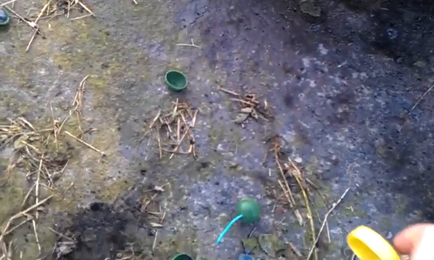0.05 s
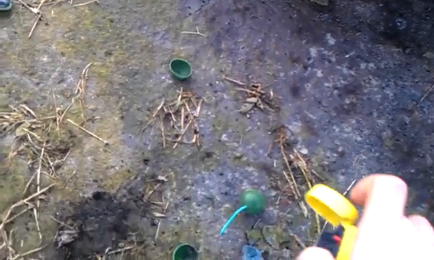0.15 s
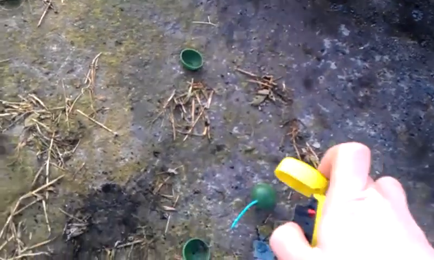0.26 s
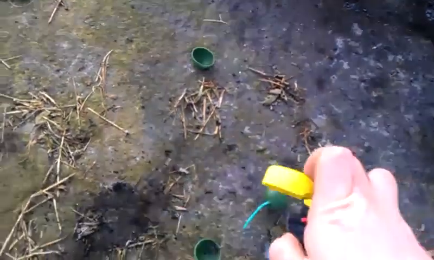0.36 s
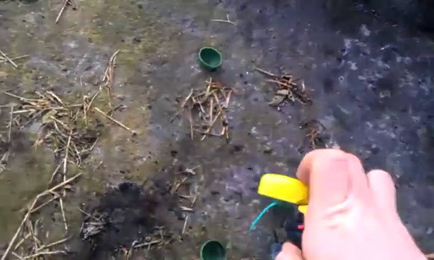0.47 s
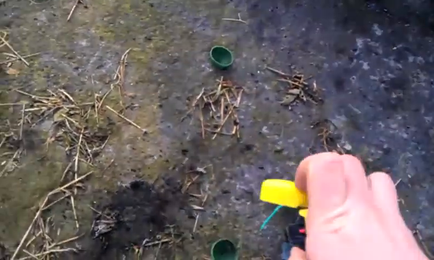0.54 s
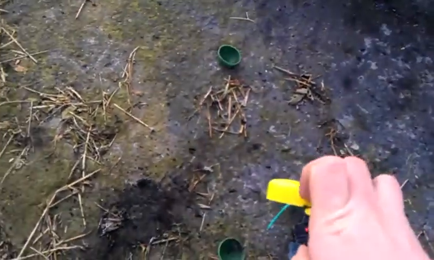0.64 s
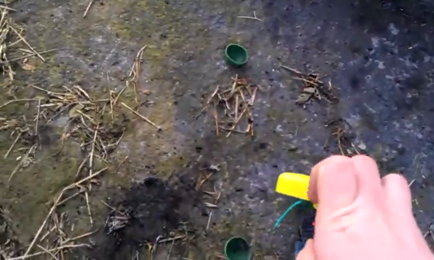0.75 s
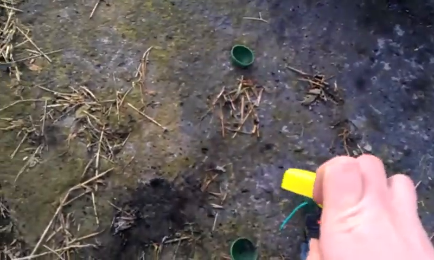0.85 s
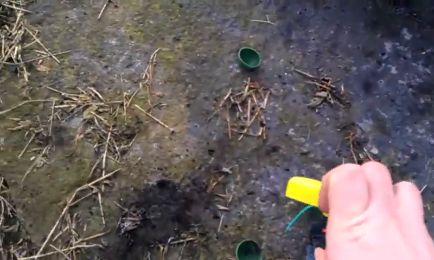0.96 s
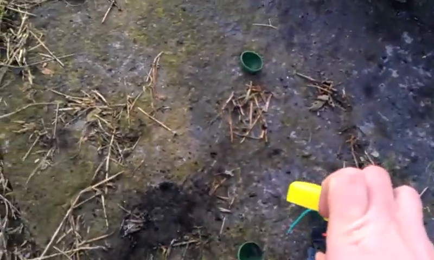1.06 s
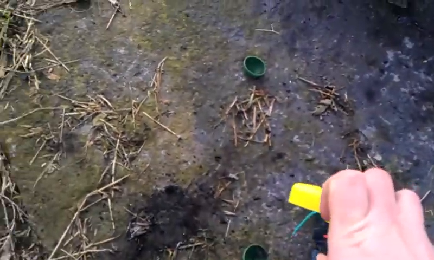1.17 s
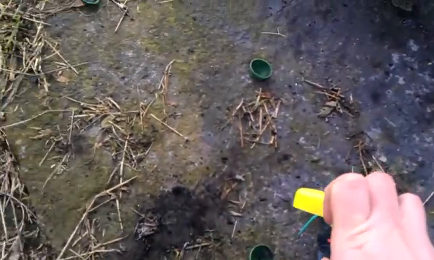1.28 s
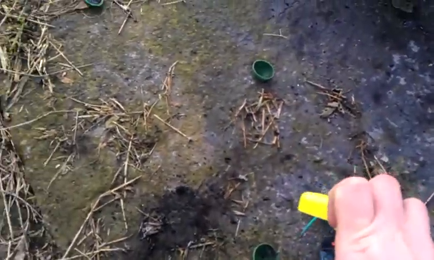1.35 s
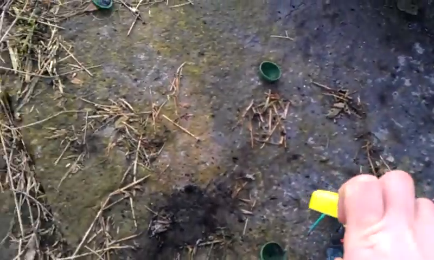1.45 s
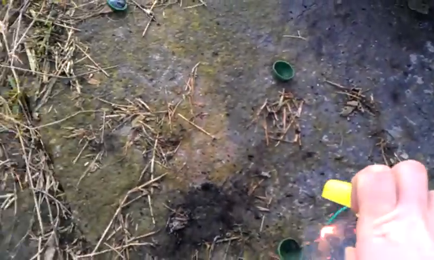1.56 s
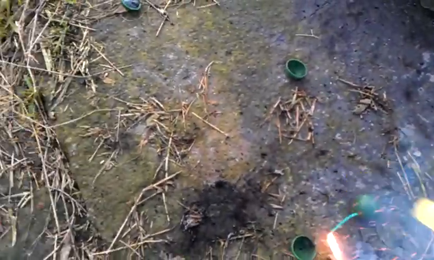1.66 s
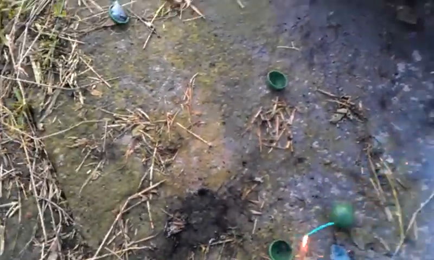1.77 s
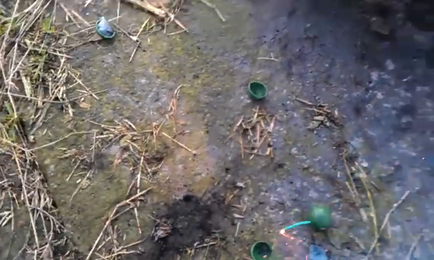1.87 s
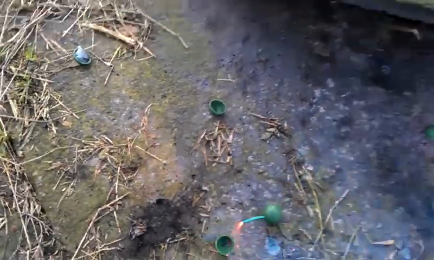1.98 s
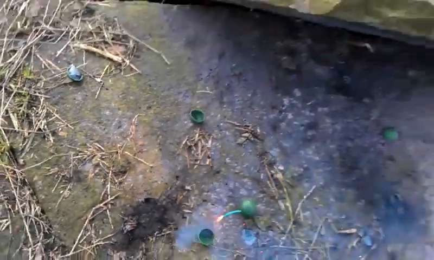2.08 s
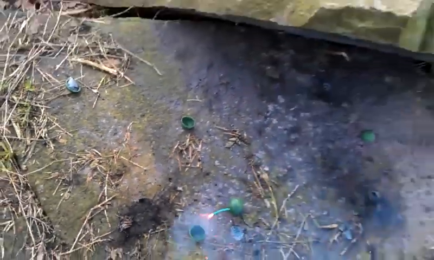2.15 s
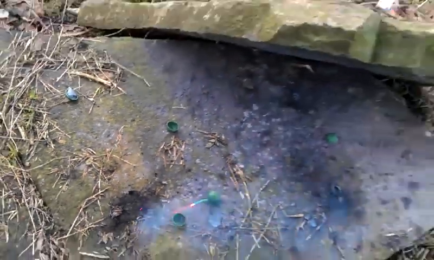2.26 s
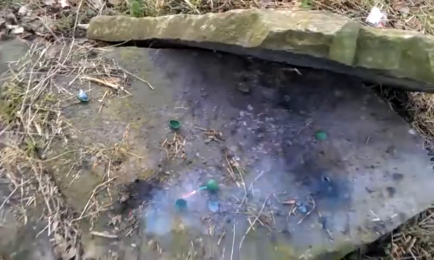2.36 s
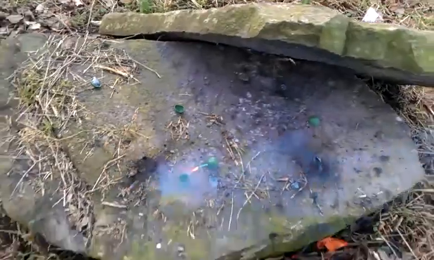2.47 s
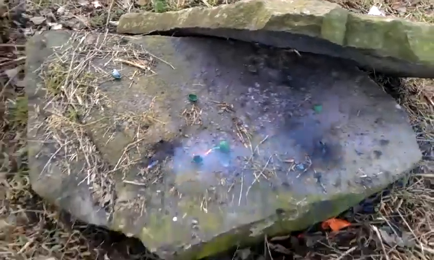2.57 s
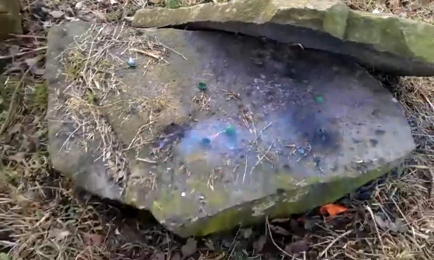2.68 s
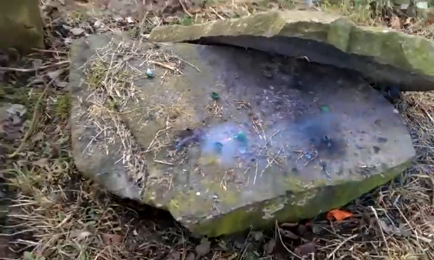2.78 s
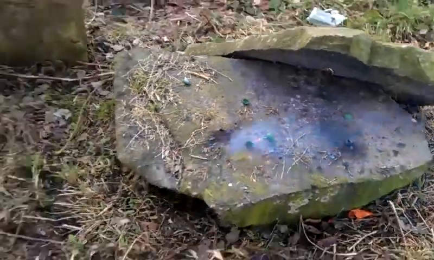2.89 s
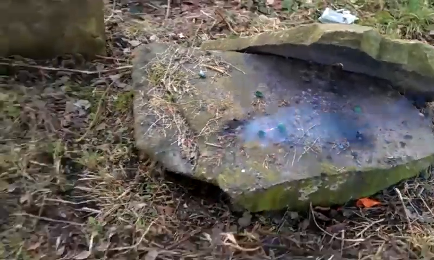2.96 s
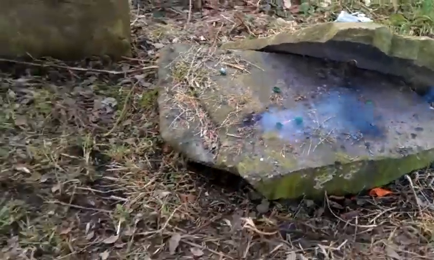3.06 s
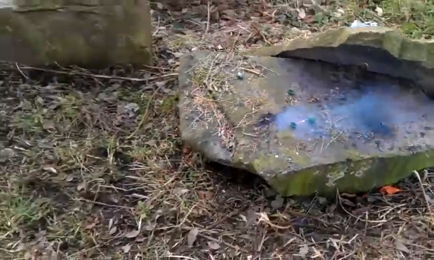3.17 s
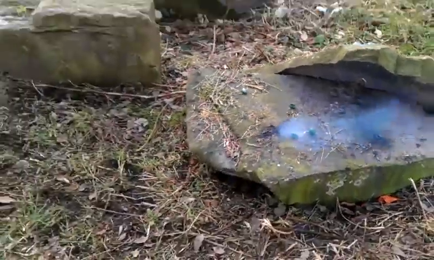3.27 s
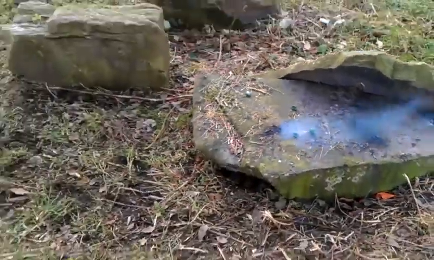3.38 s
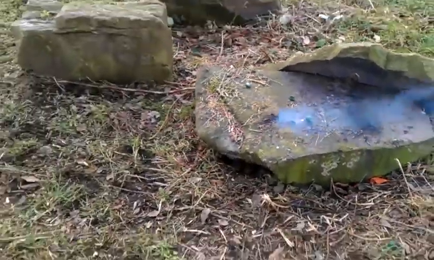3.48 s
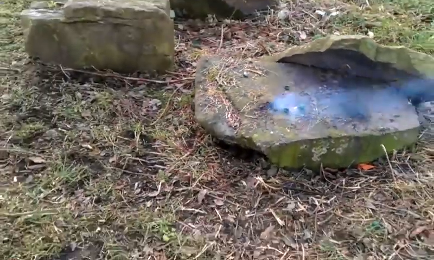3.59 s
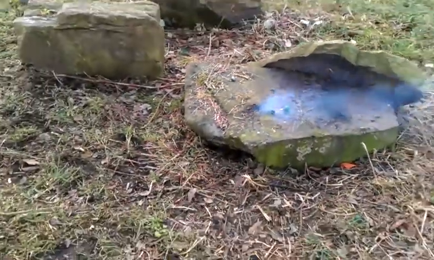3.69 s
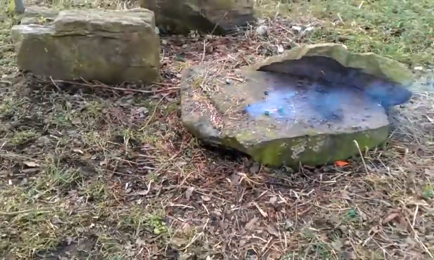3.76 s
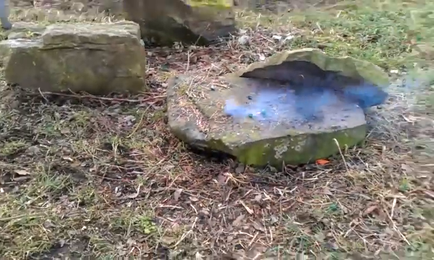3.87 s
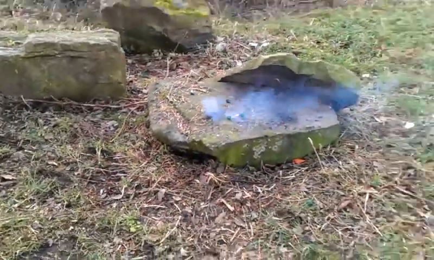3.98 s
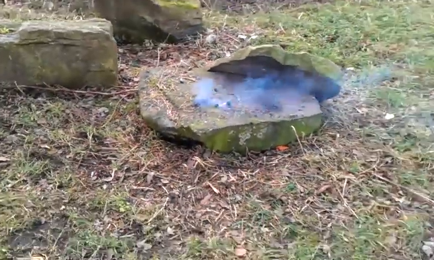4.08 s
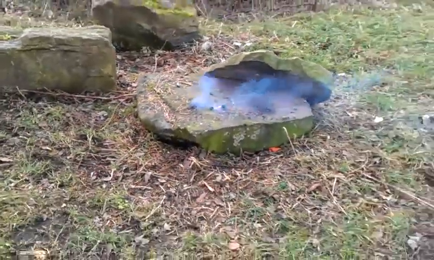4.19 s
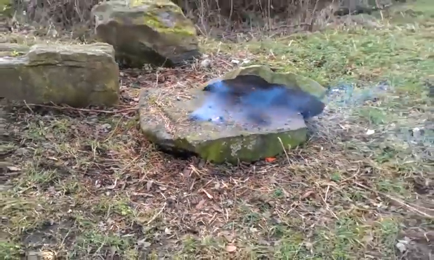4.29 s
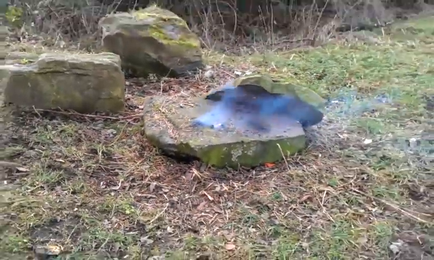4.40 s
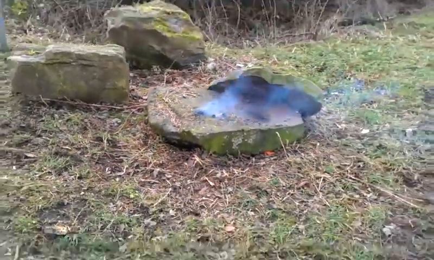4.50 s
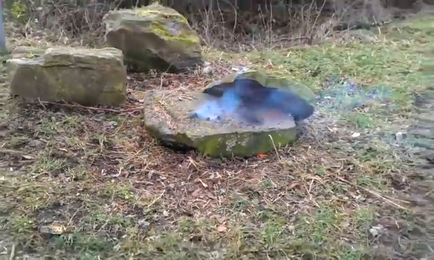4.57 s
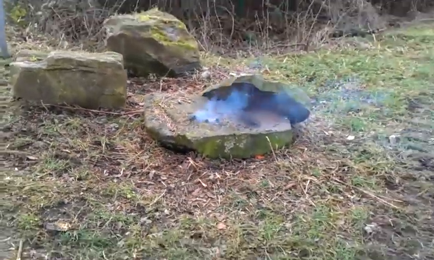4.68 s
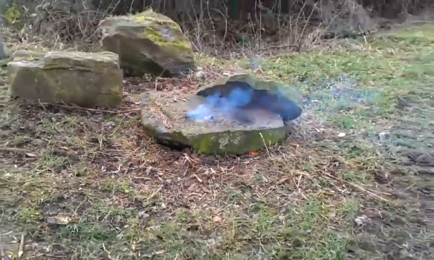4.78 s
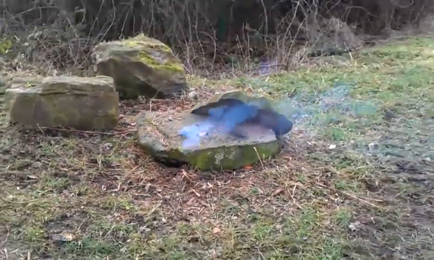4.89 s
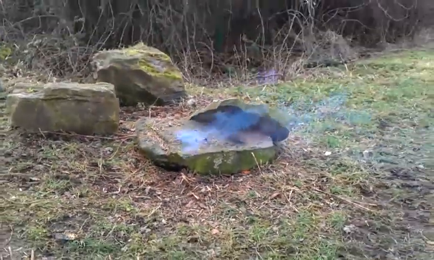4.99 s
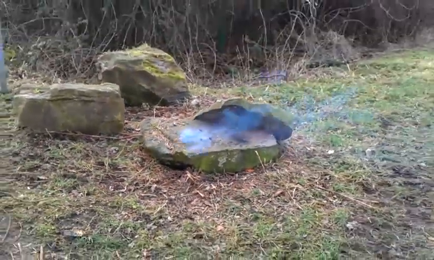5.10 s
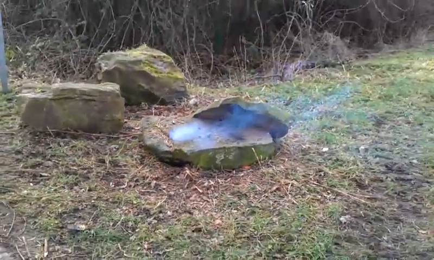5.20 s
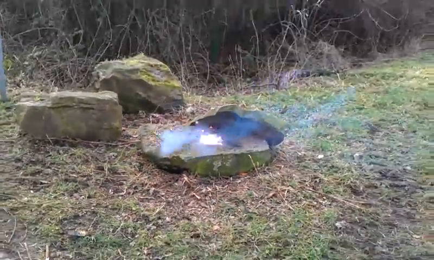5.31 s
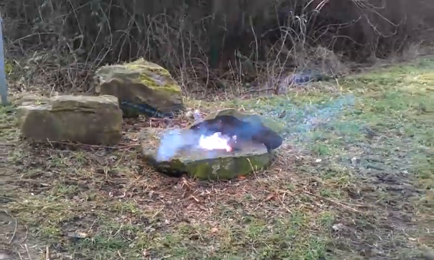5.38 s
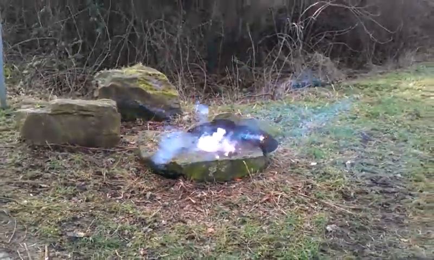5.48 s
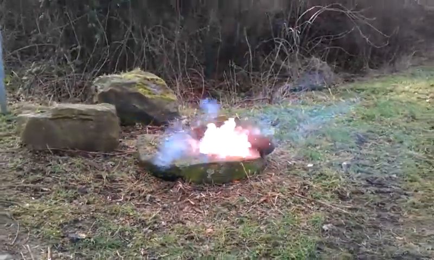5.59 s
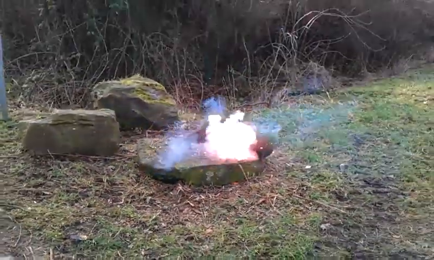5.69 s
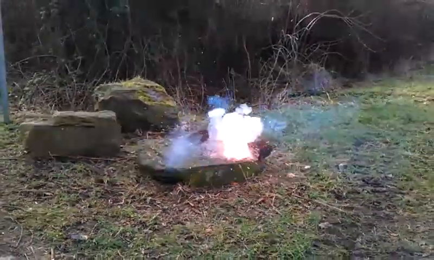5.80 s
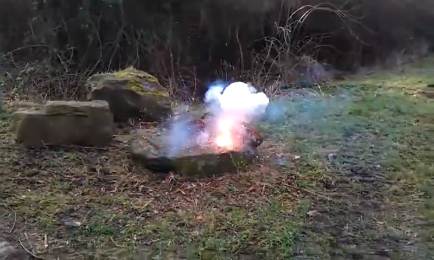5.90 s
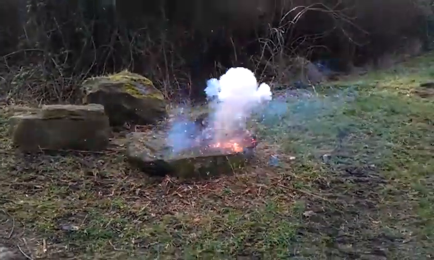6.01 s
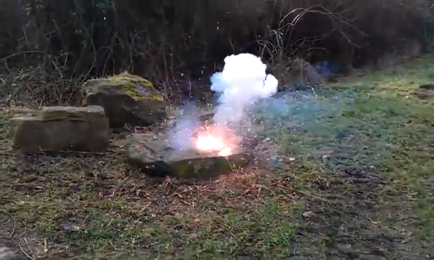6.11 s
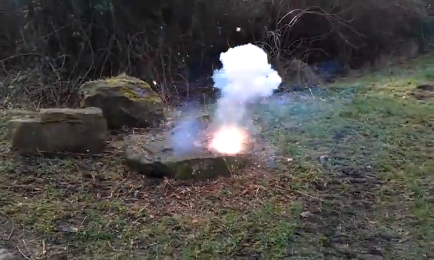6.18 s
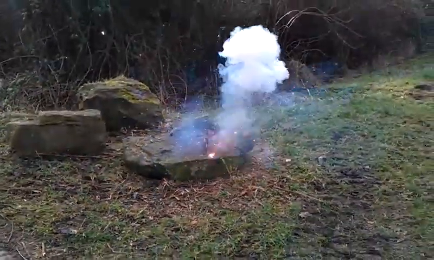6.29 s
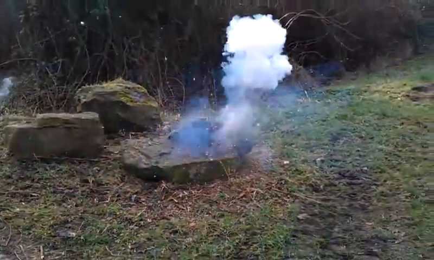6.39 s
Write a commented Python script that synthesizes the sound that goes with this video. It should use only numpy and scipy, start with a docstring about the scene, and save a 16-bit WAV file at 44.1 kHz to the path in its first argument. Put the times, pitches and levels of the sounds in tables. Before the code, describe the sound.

Outdoors, a sleeve rustles faintly, then a gas lighter clicks and burns with a soft jet flame. A small firework's fuse flares up, hissing and sputtering, and grows fainter as the person holding the microphone backs away with faint, low steps. The fuse spurts, the shell snaps and single cracks ring out. Loud, dense crackling follows, overloading the mono microphone.

```python
"""A sleeve rustles in the open air, then a gas lighter clicks and burns with a small jet flame.
The fuse of a little firework on a stone slab flares up, hissing and sputtering as its powder burns,
and grows fainter while the person holding the microphone backs away over the grass.
The fuse spurts, the shell splits and single cracks ring out. A storm of exploding granules follows,
hard enough to overload the mono microphone and drive its limiter."""
import sys
import numpy as np
from scipy import signal
from scipy.fft import rfft, irfft, next_fast_len
from scipy.io import wavfile
from scipy.ndimage import map_coordinates

SR = 44100
rng = np.random.default_rng(int(sys.argv[2]) if len(sys.argv) > 2 else 0)


def master_out(mix):
    """Clip the mix to full scale and print it as 16-bit PCM to the path in sys.argv[1]."""
    frames = np.transpose(np.atleast_2d(mix))
    ceiling = np.clip(frames, -1, 1)
    pcm = np.round(ceiling * 32767).astype(np.int16)
    wavfile.write(sys.argv[1], SR, pcm)


N = 284445
TIME = np.arange(N) / SR

# soft bed of open air: frequency_hz, level_db
AIR_COLOUR = [(15, -34), (25, -15), (75, -6), (173, -2), (233, -4), (322, -8), (389, -9), (482, -9),
              (703, -8.5), (762, -7.5), (1570, -11), (1800, -16), (3000, -22.5), (15500, -29.5)]
# footfalls and jolts of the hand: peak_s, level_db
STEPS = [(1.36, -56), (2.28, -54), (3.0, -51), (3.33, -53), (3.98, -64), (4.3, -59), (4.61, -51),
         (4.77, -47), (5.18, -49), (5.36, -49), (5.52, -56)]
# their low rumble: frequency_hz, level_db
RUMBLE_COLOUR = [(20, -7), (50, -2), (90, -3.5), (150, -9.5), (260, -46), (600, -60)]
# knocks of grip, twigs and splitting shell: start_s, level_db, centre_hz, edge_to_centre_ratio, t60_s
KNOCKS = [(0.359, -36, 2000, 1.17, 0.024), (2.529, -36, 400, 1.3, 0.027), (2.54, -40, 600, 2.5, 0.032),
          (2.664, -32.5, 113, 1.65, 0.15), (2.730, -35, 79.5, 1.65, 0.075), (2.837, -35, 650, 1.4, 0.022),
          (3.83, -38, 520, 1.7, 0.06), (4.344, -37, 377, 1.75, 0.039), (5.3362, -5, 1750, 3, 0.023)]
# thin hiss of escaping gas: frequency_hz, level_db
GAS_COLOUR = [(4000, -41), (6000, -9), (7500, 6), (9500, -4), (12000, -8), (16000, -15)]
# spits of gas: peak_s, level_db
GAS_SPITS = [(.82, -46.5), (1.255, -56)]
# hollow rush of the flame: frequency_hz, level_db
FLAME_COLOUR = [(200, -27), (320, -25), (800, -0.5), (1080, -8), (1510, -6), (1760, -11), (2050, -5),
                (2600, -13), (3700, -11.5), (4130, -24), (4600, -14), (5050, -14), (6300, -9.5),
                (8200, -18.5), (15500, -31)]
# snaps of the lighter's trigger: start_s, level_db
TRIGGER_SNAPS = [(.7572, 5.5), (.7690, -24)]
# ring of its plastic body: pitch_hz, level_db, t60_s
LIGHTER_MODES = [(1675, -13, .025), (2190, -3, .028), (2370, -6, .025), (2650, -15, .018),
                 (4005, -15, .025), (4430, -16, .022), (5414, -4, .022), (6215, -9, .016), (6798, -4, .02),
                 (7900, -4, .016), (8866, -7, .018), (9300, -6, .018), (10400, -8, .018),
                 (12600, -14, .014), (14030, -12, .016), (15100, -13, .014)]
# ticks as the trigger is let go: start_s, level_db
RELEASE_TICKS = [(2.6528, 4), (2.6565, 2.5), (2.66, -3.5)]
# their sharp, dry tone: frequency_hz, level_db
TICK_COLOUR = [(300, -53), (1100, -10), (1900, -0.5), (3000, -1.5), (6000, 5), (10000, 0), (16000, -14)]
# the holder's retreat from the fuse: time_s, distance_m
DISTANCE = [(2.0, .35), (2.75, 0.84), (3.5, 1.69), (4.7, 2.68), (5.7, 2.55)]
# the powder surges or falters, hardest just before the shell splits: peak_s, rise_s, fall_s, change_db
SURGES = [(1.8, 0.064, 0.095, 8), (2.38, 0.1, 0.032, 3.5), (2.72, 0.12, 0.038, 2.5), (3.2, 0.29, 0.24, 2.5),
          (3.63, .06, 0.096, -3), (3.8, .05, 0.081, 1), (4.02, 0.044, 0.089, 3), (4.35, 0.055, .1, 2),
          (4.86, 0.076, 0.25, 11), (5.17, 0.13, .08, 2.5), (5.316, 0.053, 0.036, 19), (5.4, .03, 0.057, 5),
          (5.545, 0.044, 0.025, 9), (5.63, 0.052, .2, 7.5)]
# bright jet of the fuse: frequency_hz, level_db
JET_COLOUR = [(1500, -48), (3000, -21), (4200, -9), (5500, -3.5), (7300, 1), (8500, -3.5), (10000, -11),
              (12000, -25.5), (16000, -53)]
# midrange roar under the jet: frequency_hz, level_db
ROAR_COLOUR = [(200, -24), (500, -15), (900, -5.5), (1400, -5), (2800, -1), (4000, -1), (7000, -17.5)]
# fine sizzle on top: frequency_hz, level_db
SIZZLE_COLOUR = [(7000, -23), (10000, 1), (12000, 0), (16000, -4.5)]
# flare of the priming and the low flutter after it: frequency_hz, level_db
FLARE_COLOUR = [(120, -27.5), (300, 1.5), (470, -8.5), (750, 0), (1050, -4.5), (1400, -9), (2500, -5),
                (5000, -36)]
# reflection off the holder's chest: time_s, lag_ms, gain
CHEST_ECHO = [(.9, 1.6, .22), (1.65, 1.64, .27), (2.05, 1.51, .46), (2.85, 1.655, .28), (4.3, 1.68, 0),
              (4.65, 1.65, .32), (4.88, 1.605, .39), (5.17, 1.715, .44), (5.6, 1.67, .06)]
# passing reflections off hand, arm and sleeve: start_s, end_s, first_lag_ms, last_lag_ms, gain
ARM_ECHOES = [(.6, 1.85, 1.32, 1.42, 0.27), (.6, 1.8, .8, .84, 0.13), (.6, 1.8, 1.04, 0.99, 0.1),
              (1.95, 2.75, .66, 0.78, .18), (2.75, 3.5, .715, .705, 0.25), (2.8, 3.55, 0.88, 1.09, 0.2),
              (3.25, 3.95, .68, .93, .28), (2.8, 3.5, 1.67, 1.14, 0.17), (2.8, 4.4, 1.83, 2.01, 0.12),
              (4.3, 5.4, .75, .67, 0.12)]
# single cracks, some with a thump on the microphone: start_s, crack_db, thump_db
CRACKS = [(5.4948, 4, -60), (5.5947, 4, -60), (5.61, -14, -60), (5.684, -9, -56), (5.69, 5, -60),
          (5.728, -1, -28), (5.7347, 3.5, -31), (5.7832, 10, -21), (5.8386, -5, -15), (5.886, -9, -16.5),
          (5.928, -10, -22.5), (5.9472, 5, -22.5), (6.008, -11, -20), (6.0367, 1, -20.5), (6.091, 9, -20),
          (6.135, 11, -32), (6.148, -11, -19.5), (6.1678, 3, -28), (6.1796, -2, -18.5), (6.269, -5, -60),
          (6.2848, 2, -31), (6.3065, -4.5, -15), (6.372, -2, -13.5)]
# crisp tone of the cracks, shared by trigger snap and sleeve: frequency_hz, level_db
CRISP_COLOUR = [(88, -34), (150, -11.5), (217, -9.5), (464, -7.5), (833, -13), (1090, -7.5), (2120, -8.5),
                (2430, -6.5), (2630, -7.5), (2840, -6.5), (3740, -6), (7250, 5.5), (10100, -6.5),
                (14900, -16), (15800, -11)]


def from_db(db):
    """Decibels to gain."""
    return 10 ** (np.asarray(db) / 20)


def in_time(rows):
    """Each column of a curve, joined by straight lines."""
    times, *columns = np.transpose(rows)
    return [np.interp(TIME, times, column) for column in columns]


def held(start_s, attack_s, end_s=np.inf, release_s=1):
    """Envelope: a straight attack, a hold and a dying release."""
    return np.clip((TIME - start_s) / attack_s, 0, 1) * np.exp(-np.maximum(TIME - end_s, 0) / release_s)


def swell(peak_s, rise_s, fall_s):
    """Envelope: a rounded hump of height 1."""
    return np.exp(-((TIME - peak_s) / np.where(TIME < peak_s, rise_s, fall_s)) ** 2)


def drift(rate_hz):
    """A wobble that glides between random values of spread 1."""
    knots = rng.standard_normal(N // 8)
    return np.interp(TIME * rate_hz, np.arange(len(knots)), knots)


def colour(x, spectrum):
    """Minimum-phase EQ that keeps the power of white noise."""
    size = 2 * next_fast_len(N // 2 + 8192)
    hz, db = np.transpose(spectrum)
    bins_hz = np.arange(size // 2 + 1) * SR / size
    shape = from_db(np.interp(np.log(bins_hz + 1), np.log(hz), db))
    shape /= np.sqrt(np.mean(shape ** 2))
    cepstrum = irfft(np.log(shape))
    cepstrum[1:size // 2] *= 2
    cepstrum[size // 2 + 1:] = 0
    return irfft(rfft(x, size) * np.exp(rfft(cepstrum)))[:N]


def noise(spectrum):
    """Steady coloured noise of rms 1."""
    return colour(rng.standard_normal(N), spectrum)


def impulses(events):
    """One click for each (start_s, level_db)."""
    clicks = np.zeros(N)
    for start_s, db in events:
        clicks[round(start_s * SR)] += from_db(db)
    return clicks


def bursts(clicks, t60_s):
    """Each click starts a burst of noise that dies away."""
    power = signal.lfilter([1], [1, -from_db(-120 / (t60_s * SR))], clicks ** 2 + 1e-18)
    return np.sqrt(power) * rng.standard_normal(N)


def ring(clicks, hz, t60_s):
    """Each click sets a dying sine ringing."""
    decay, angle = from_db(-60 / (t60_s * SR)), 2 * np.pi * hz / SR
    return signal.lfilter([0, np.sin(angle)], [1, -2 * decay * np.cos(angle), decay ** 2], clicks + 1e-18)


def butter(x, hz, kind, order=2):
    """Butterworth filter."""
    return signal.sosfilt(signal.butter(order, hz, kind, fs=SR, output="sos"), x)


def delayed(x, lag_ms):
    """The sound, late by a moving lag."""
    return map_coordinates(x, [np.arange(N) - lag_ms * SR / 1000], order=3)


def surroundings(air_db=-53.5, handling_db=-59.5, rustle_db=-58, brush_db=-54):
    """Open air wavers, a sleeve rustles and brushes once as the hand reaches out, and steps rumble."""
    air = from_db(air_db - drift(6.6)) * noise(AIR_COLOUR)
    rustle = from_db(rustle_db) * held(0, .004, end_s=.18, release_s=.28)
    brush = from_db(brush_db) * swell(.109, .01, .01)
    steps = sum(from_db(db) * swell(peak_s, .03, .058) for peak_s, db in STEPS)
    rumble = (from_db(handling_db) + steps) * noise(RUMBLE_COLOUR)
    return air + rumble + (rustle + brush) * noise(CRISP_COLOUR)


def knocks():
    """The grip on the lighter, twigs underfoot and the shell giving way: short, dull bands of noise."""
    sound = np.zeros(N)
    for start_s, db, hz, ratio, t60_s in KNOCKS:
        burst = bursts(impulses([(start_s, db)]), t60_s)
        makeup_gain = np.sqrt(SR / (np.pi * hz))
        sound += makeup_gain * butter(burst, [hz / ratio, hz * ratio], "band")
    return sound


def jet_flame(valve_s=.66, lit_s=.765, off_s=1.56, gas_db=-53, flame_db=-50, sag_db_per_s=6):
    """Gas escapes the lighter, then burns as a small jet flame that spits and slowly sinks."""
    attack_s, release_s = .0092, .036
    gas = from_db(gas_db) * held(valve_s, attack_s, lit_s, release_s)
    spits = sum(from_db(db) * swell(peak_s, .014, .014) for peak_s, db in GAS_SPITS)
    flame = from_db(flame_db - sag_db_per_s * (TIME - lit_s)) * held(lit_s, attack_s, off_s, release_s)
    return flame * noise(FLAME_COLOUR) + (gas + spits) * noise(GAS_COLOUR)


def lighter_clicks(body_db=-10, snap_db=-11, tick_db=-11):
    """The trigger snaps and rings the plastic body; later it springs back with three dry ticks."""
    press = impulses(TRIGGER_SNAPS)
    body = sum((-1) ** k * from_db(db) * ring(press, hz, t60_s)
               for k, (hz, db, t60_s) in enumerate(LIGHTER_MODES))
    snap = colour(bursts(press, t60_s=.02), CRISP_COLOUR)
    snap = butter(snap, 570, "high", order=1)
    ticks = colour(bursts(impulses(RELEASE_TICKS), t60_s=.03), TICK_COLOUR)
    return from_db(body_db) * body + from_db(snap_db) * snap + from_db(tick_db) * ticks


def fuse(catch_s=1.542, enter_shell_s=4.11, split_s=5.34, loss_db_per_doubling=4):
    """Powder flares up, then burns unevenly, grain by grain and in surges, fading as the holder retreats."""
    distance_m, = in_time(DISTANCE)
    distance_gain = from_db(-loss_db_per_doubling * np.log2(distance_m))
    steady = held(catch_s, attack_s=.18) ** .74 * distance_gain
    surge_db = sum(db * swell(peak_s, rise_s, fall_s) for peak_s, rise_s, fall_s, db in SURGES)
    vigour = steady * from_db(surge_db + .93 * drift(14))
    # the burn creeps into the shell, which muffles roar and sizzle until it splits
    muffled = held(enter_shell_s, .65, split_s, .062)
    jet = from_db(-36.5) * noise(JET_COLOUR)
    roar = from_db(-46.5 - 3.5 * muffled) * noise(ROAR_COLOUR)
    sizzle = from_db(-46 - 9 * muffled) * held(catch_s, attack_s=.15) * noise(SIZZLE_COLOUR)
    flare = from_db(-37.5) * swell(peak_s=1.748, rise_s=.11, fall_s=.08)
    flutter = from_db(-57) * steady
    burn = vigour * (jet + roar + sizzle) + (flare + flutter) * noise(FLARE_COLOUR)
    sputter_db = 1.16 * drift(70)
    grain_db = .98 * drift(900)
    return burn * from_db(sputter_db + grain_db)


def holder_reflections(hiss, fade_s=.24):
    """Echoes off chest and arm comb the hiss; their notches slide as the holder moves."""
    chest_lag_ms, chest_gain = in_time(CHEST_ECHO)
    sound = hiss + chest_gain * delayed(hiss, chest_lag_ms)
    for start_s, end_s, first_ms, last_ms, gain in ARM_ECHOES:
        fade = np.clip(np.minimum(TIME - start_s, end_s - TIME) / fade_s, 0, 1)
        lag_ms = np.interp(TIME, [start_s, end_s], [first_ms, last_ms])
        sound += gain * fade * delayed(hiss, lag_ms)
    return sound


def crackle(storm_s=5.69, cracks_per_s=1700, swell_db=19, spread_db=3.6):
    """Granules explode: each gives a shock, a short scatter off the stones and a faint tail from the trees."""
    storm_db = -15 - swell_db * (1 - held(storm_s, attack_s=.075))
    explodes = (TIME >= storm_s) & (rng.random(N) < cracks_per_s / SR)
    storm = explodes * from_db(storm_db + spread_db * rng.standard_normal(N))
    start_s, crack_db, thump_db = np.transpose(CRACKS)
    clicks = storm + impulses(zip(start_s, crack_db))
    shock = from_db(2) * clicks
    scatter = bursts(clicks, t60_s=.02)
    tail = from_db(-28) * bursts(clicks, t60_s=.29)
    cracks = butter(colour(shock + scatter + tail, CRISP_COLOUR), 130, "high")
    # granules that kick the microphone move more air, which gives their cracks a midrange body
    blast = bursts(impulses(zip(start_s, thump_db)), t60_s=.022)
    return cracks + from_db(17) * butter(blast, [220, 1700], "band")


def limiter(x, threshold_db=-11.3, attack_s=.0003, release_db_per_s=500):
    """The gain ducks within a millisecond on a peak and recovers quickly."""
    over_db = np.maximum(20 * np.log10(np.abs(x) + 1e-9) - threshold_db, 0)
    recovery_db = release_db_per_s * TIME
    duck_db = np.maximum.accumulate(over_db + recovery_db) - recovery_db
    pole = np.exp(-1 / (attack_s * SR))
    return x * from_db(-signal.lfilter([1 - pole], [1, -pole], duck_db))


def overload_thumps(length_s=.0049, smooth_hz=600, coupling_hz=11):
    """Some cracks come with a low thump that kicks the microphone either way; it swings back slowly."""
    starts_s, _, thump_db = np.transpose(CRACKS)
    kicks = from_db(thump_db) * rng.choice([-1, 1], len(starts_s))
    push = sum(kick * (TIME >= start_s) * np.clip(1 - (TIME - start_s) / length_s, 0, 1)
               for start_s, kick in zip(starts_s, kicks))
    rounded = butter(push + 1e-18, smooth_hz, "low")
    return butter(rounded, coupling_hz, "high")


def scene():
    """All sources at one microphone, the same in both channels."""
    mono = lighter_clicks() + holder_reflections(jet_flame() + fuse()) + crackle() + knocks() + surroundings()
    return np.tile(mono, (2, 1))


def record(dry, ceiling=.5, cutoff_hz=15950):
    """The microphone overloads, a limiter holds the level, peaks are rounded and the top is cut."""
    limited = limiter(np.tanh(dry[0]))
    mono = ceiling * np.tanh(limited / ceiling) + overload_thumps()
    top_cut = signal.ellip(10, .1, 80, cutoff_hz, fs=SR, output="sos")
    return np.tile(signal.sosfilt(top_cut, mono), (2, 1))


dry = scene()
out = record(dry)
master_out(out)
```